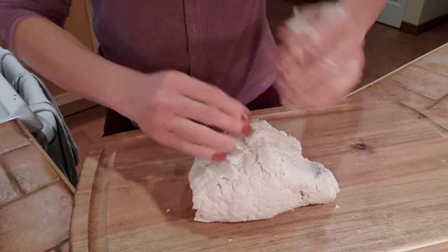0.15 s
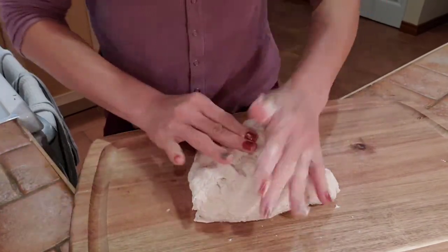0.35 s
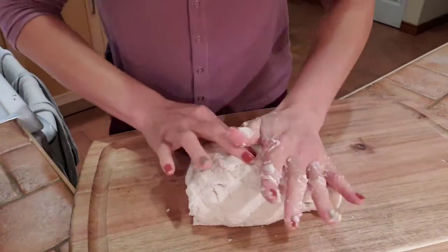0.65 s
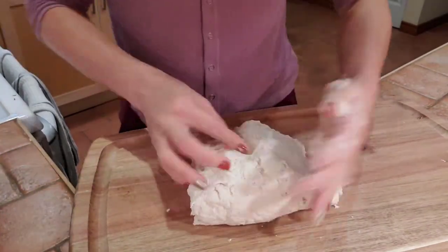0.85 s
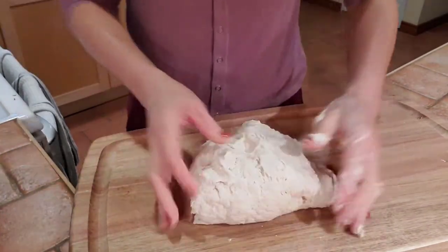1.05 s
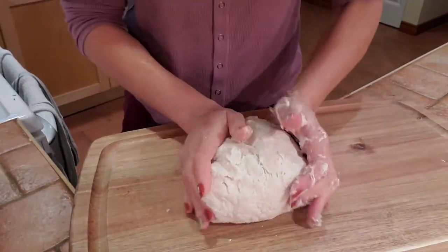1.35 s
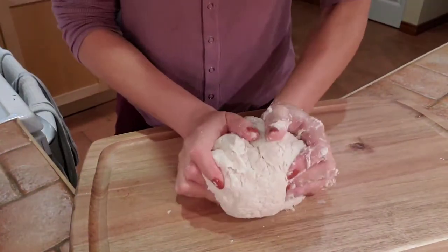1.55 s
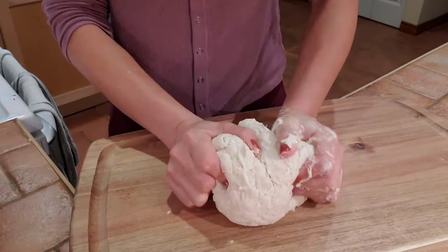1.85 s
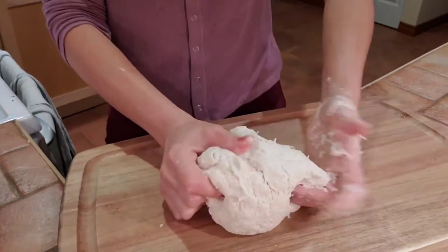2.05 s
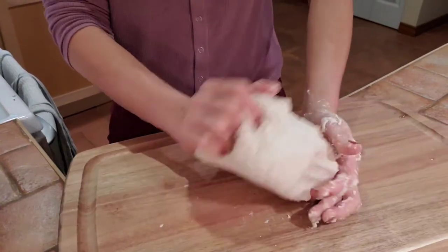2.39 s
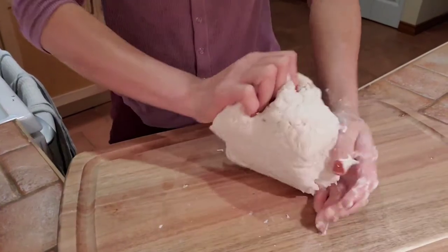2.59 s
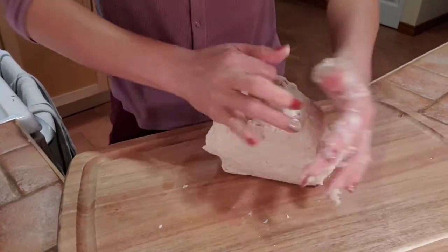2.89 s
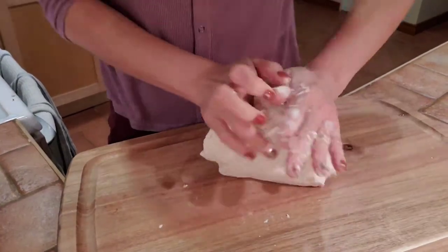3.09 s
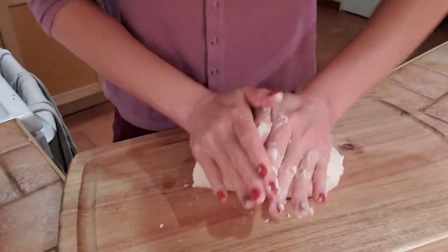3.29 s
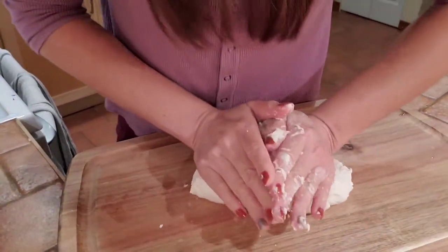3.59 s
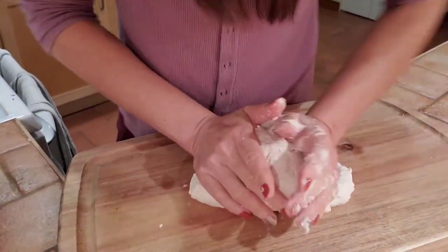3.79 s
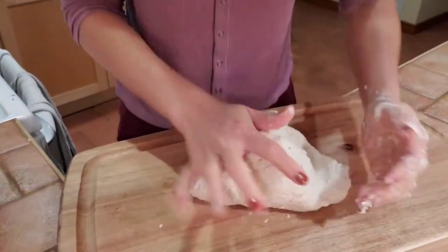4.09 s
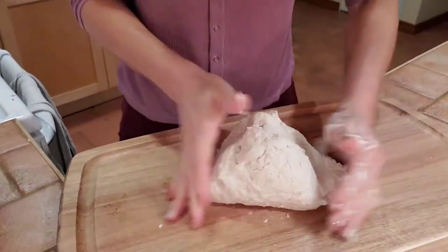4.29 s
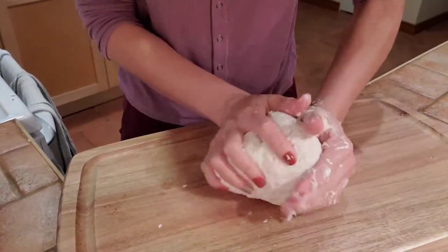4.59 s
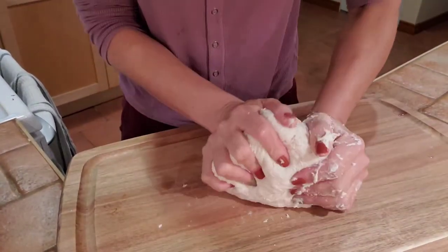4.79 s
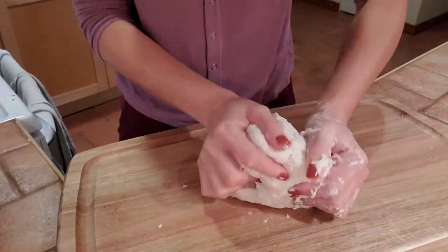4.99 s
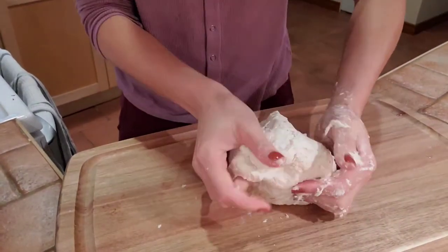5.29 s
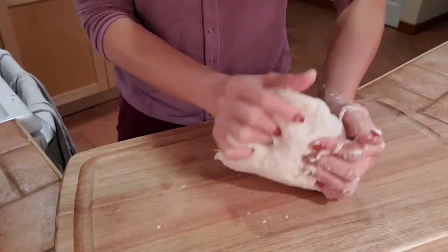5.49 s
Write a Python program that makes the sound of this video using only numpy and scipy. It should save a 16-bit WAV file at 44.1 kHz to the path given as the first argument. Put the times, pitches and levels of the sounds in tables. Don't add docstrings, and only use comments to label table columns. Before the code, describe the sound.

Close stereo sound of dough being kneaded on a wooden board in a quiet kitchen. Deep counter thumps come first, then sticky peeling ticks and a hissy, slightly squeaky rub. A crisp slap and a heavier, duller drop follow mid-way, then softer pressing with abrupt slips around 4 seconds, and finally clustered slaps and a hard woody knock. Short room reverberation, faint metal ringing after heavy blows.

```python
import sys
import numpy as np
from scipy import signal
from scipy.fft import rfft, irfft, next_fast_len
from scipy.io import wavfile
from scipy.ndimage import uniform_filter1d, map_coordinates

SR = 44100
rng = np.random.default_rng(int(sys.argv[2]) if len(sys.argv) > 2 else 0)


def dump(signal):
    limited = np.clip(np.atleast_2d(signal).T, -1, 1)
    pcm = np.round(limited * 32767).astype(np.int16)
    wavfile.write(sys.argv[1], SR, pcm)


def volts_from_db(level):
    exponent = np.asarray(level, float) / 20
    return 10 ** exponent


N = 249165

# peak in seconds, hiss in dB, rise in seconds, fall in seconds, flour minus hiss in dB.
STROKES = [(0.045, -85, .08, 0.042, 14), (2.89, -83.5, .1, .25, 14.5), (0.74, -83, 0.17, .15, 1),
           (0.9, -67.5, 0.13, 0.098, 12.5), (1.15, -75.5, 0.029, 0.46, -3.5), (1.41, -62, 0.11, 0.091, -6),
           (1.57, -65, 0.13, .3, 4), (1.75, -37.5, 0.063, 0.13, 1.5), (1.8, -34, 0.12, 0.051, -2),
           (1.96, -68.5, 0.26, 0.28, -4), (2.114, -51.5, 0.13, 0.07, 2.5), (2.25, -71, .3, 0.22, 11.5),
           (2.438, -47, 0.12, 0.13, 8.5), (2.736, -63.5, 0.1, 0.12, 7), (2.795, -64, 0.026, 0.032, 12),
           (3.904, -67, 0.099, 0.11, 10.5), (3.984, -44, 0.064, 0.037, 1.5), (4.05, -64.5, 0.12, 0.28, 5.5),
           (4.178, -59.5, 0.14, 0.045, 8), (4.56, -67, 0.14, 0.22, 10.5), (5.04, -78.5, 0.031, 0.73, 13),
           (5.12, -69.5, 0.15, 0.095, 9), (5.48, -53, 0.09, 0.21, 9), (5.585, -60.5, 0.15, 0.14, 8)]
LANDINGS = [
    (0.815, -58, 0.023, 0.17, 4),
    (1.32, -68, 0.035, 0.24, 5),
    (2.026, -66.5, .003, 0.098, 12),
    (3.082, -70.5, 0.0036, 0.18, 5),
    (4.385, -62.5, 0.026, 0.23, 0.5),
    (5.144, -63, 0.0068, .13, 7.5),
]
# peak in seconds, rasp in dB, rise in seconds, fall in seconds, drag minus rasp in dB.
PRESSES = [(0.22, -81.5, .12, .3, -11), (2.663, -64, .004, .08, 9.5), (5.135, -62, 0.021, .02, 6),
           (0.46, -65.5, 0.042, 0.11, 5.5), (0.83, -56.5, 0.037, 0.17, 3), (1.15, -71.5, 0.044, 0.19, 10),
           (1.345, -57, 0.028, 0.23, -1), (1.56, -56.5, 0.079, 0.14, 3.5), (1.74, -43.5, 0.11, 0.1, -8),
           (1.81, -40.5, 0.11, 0.073, -3), (2.026, -40, 0.009, 0.025, 7.5), (2.114, -42.5, 0.14, 0.083, 3),
           (2.442, -43, 0.11, 0.074, 4.5), (2.7, -59.5, 0.0042, 0.081, 21.5),
           (2.79, -60.5, 0.053, 0.063, -9), (3.088, -57, 0.019, 0.089, 2), (3.13, -63, 0.022, 0.19, 5),
           (3.984, -47, 0.058, 0.064, 1.3), (4.03, -74.5, .05, 0.38, 11), (4.178, -62.5, 0.22, 0.039, 8.5),
           (4.36, -61.5, 0.0036, 0.092, 4.5), (4.45, -65, 0.28, 0.22, 11), (5.07, -75, 0.12, 0.41, 5.5),
           (5.145, -45, .003, 0.091, 11.5), (5.48, -57.5, 0.062, 0.27, 3), (5.635, -71, .003, 0.044, 26.5)]
# start in seconds, peak in dB, rasp
# minus hiss in dB, 60 dB decay in seconds.
TOUCHES = [(0.4333, -37, -4, 0.3), (0.8076, -39.5, -8, 0.1), (0.9188, -42.5, -27, 0.027),
           (2.2644, -45, -3, 0.063), (2.3687, -30.5, 1.5, 0.089), (3.2415, -38.5, -36, 0.13),
           (3.2654, -48.5, -21.5, 0.083), (3.8776, -40.5, -7, 0.093), (3.9608, -34, -10, 0.1),
           (3.9764, -34.5, 9, 0.072), (4.1887, -48, -1.5, 0.037), (4.35, -46.5, 4, 0.078),
           (2.4319, -32, 5.5, 0.052), (1.135, -64, 0, 0.045), (2.784, -42, -13, .04),
           (2.806, -42.5, -22.5, .03), (2.828, -47.5, -17, .03), (2.857, -50, -15, .05),
           (2.972, -57.5, -15, 0.048), (3.12, -47, -12, .04), (1.664, -44, 2.5, .05), (1.721, -31, -1, 0.037)]
# frequency in Hz, density in dB per Hz.
HISS = [(2120, -39), (3600, -8.5), (4310, -4), (4730, -2), (5490, -2.5), (5960, -1), (6960, -2.5),
        (8400, -13), (10900, -46), (18500, -120)]
FLOUR = [(6500, -25.5), (8300, -7), (8900, -1), (9430, -0.5), (10700, -2), (11700, 1), (12800, -2.5),
         (14800, 3), (15600, -13)]
RASP = [(590, -51.5), (1000, -11.5), (1200, 1), (1360, -9), (1530, -2), (1690, -0.5), (2240, -0.5),
        (2700, -0.5), (3350, -2.5), (4200, -5), (5460, -24), (9240, -120)]
DRAG = [(90, -36.5), (150, -9.5), (215, 4), (260, -3.5), (340, -4.5), (500, 2.5), (600, -4), (700, 1),
        (900, -7), (1050, -11.5), (1300, -18), (1800, -42.5), (2800, -120)]
# peak in seconds, centre in Hz, level in dB, rise in seconds, fall in seconds.
SLIDES = [
    (1.348, 688, -44, 0.017, 0.12),
    (1.8, 2337, -39.5, 0.15, 0.14),
    (3.0, 2350, -68.5, 0.081, 0.13),
    (3.092, 1720, -52.5, .015, 0.018),
    (3.135, 1745, -45, 0.022, 0.083),
    (3.36, 1665, -62, 0.4, 0.069),
    (4.35, 1890, -57, 0.22, 0.22),
    (4.458, 1770, -50.5, .2, 0.064),
]
# start in seconds, peak in dB, slap minus peak in dB,
# contact in milliseconds, left minus right in dB.
BLOWS = [(1.136, -43, -16, 1.3, 1.5), (2.0214, -15, 4, 0.17, 3.5), (2.032, -17.5, -9, 0.23, 2.5),
         (2.66, -47, 1, 0.41, -6), (2.687, -18.5, -9.5, 0.14, -2), (2.693, -10.5, -23, 3.1, 10.5),
         (2.712, -12.5, -24, 2.16, -0.5), (2.741, -19.5, -37, 2.9, 6), (3.033, -44, -19, 1.7, 19),
         (4.352, -38, 1, 0.79, 1.5), (5.141, -20, 0.5, 0.2, 15), (5.157, -16, 2.5, 0.43, 2.5),
         (5.172, -21, -29, 2, -8.5), (5.2018, -24.5, -18, 7.8, 8), (5.627, -21, -15.5, 1.3, 9),
         (5.634, -6.5, -30.5, 2.7, 4)]
# frequency in Hz, level in dB, 60 dB decay in seconds.
BOARD_MODES = [(122.3, -7, 0.29), (153.4, -9.5, 0.15), (206, -9, 0.12), (221.9, -8, .18),
               (301.2, -12, 0.24), (352, -0.5, 0.063), (397.6, -9, 0.14), (470.4, -1.5, 0.076),
               (502.2, 0, 0.055), (699, 0.8, 0.062), (817, -3.5, 0.098), (894, -4, 0.1), (952, -7.5, 0.1),
               (1192, -10, 0.071)]
# frequency in Hz, width in Hz, level in dB.
SLAP_MODES = [(1342, 51, 0.5), (1620, 200, 1.1), (2070, 160, -2.5), (2440, 300, -7), (3280, 800, -14),
              (4550, 1080, -26)]
# start in seconds, peak in dB, pitch in Hz, 60 dB decay in seconds.
POPS = [(2.0213, -16, 1725, .03), (2.023, -15, 697, 0.048), (2.0873, -34, 1760, 0.059),
        (2.6878, -34.5, 1890, 0.044), (2.689, -25.5, 914, 0.044), (2.694, -18, 505, 0.11),
        (2.694, -36, 1950, .03), (2.7, -37, 1560, .05), (2.697, -31, 1200, .05),
        (4.363, -41.5, 1835, 0.048), (5.141, -20.5, 1780, 0.033), (5.17, -37.5, 1600, .12),
        (5.628, -31, 1700, .04), (2.036, -26.5, 950, .07), (2.022, -36, 4600, .02),
        (2.036, -38, 3580, .025), (5.141, -21, 800, 0.036), (5.1575, -30.5, 2570, .035),
        (5.158, -20, 505, 0.1), (5.16, -35, 3280, .04)]
# peak in seconds, sway in dB, rise in seconds, fall in seconds, panel minus sway in dB.
LEANS = [(0.0, -26.5, 0.091, 0.059, -15), (0.18, -32.5, 0.058, 0.29, 0), (0.47, -39, 0.12, 0.097, -6.5),
         (0.83, -46, 0.065, 0.15, 2), (1.04, -37.5, 0.27, 0.086, -1.5), (1.16, -43, 0.02, 0.098, 8.5),
         (1.34, -52, 0.066, 0.072, 14), (1.66, -34.5, 0.12, 0.2, -10), (1.92, -39, 0.75, 0.13, -0.5),
         (2.04, -33, 0.035, 0.19, -2), (2.4, -42, 0.22, 0.2, 1), (2.77, -45.5, 0.044, 0.15, 9),
         (2.88, -42, .2, 0.13, -2), (3.05, -39, 0.11, 0.11, 1), (3.16, -45, 0.17, 0.11, 0),
         (3.3, -37.5, 0.072, 0.36, -4), (4.03, -45, 0.41, 0.1, 8.5), (4.11, -41, 0.076, 0.5, -8),
         (4.5, -54.5, 0.14, 0.098, 10), (5.0, -40.5, 0.32, 0.23, -4), (5.21, -33.5, 0.045, 0.097, 7),
         (5.4, -38, 0.38, 0.14, -5), (5.54, -39, 0.11, 0.12, -7)]
# start in seconds, peak in dB, pitch in Hz, 60 dB decay in seconds, rise in seconds.
PUSHES = [(0.166, -9, 52.3, 0.3, 0.02), (0.183, -5, 90, 0.12, 0.017), (0.26, -24.5, 95, 0.27, 0.0201),
          (1.142, -29.5, 86.6, 0.14, 0.0043), (1.651, -18, 64, 0.13, 0.01),
          (1.682, -22.5, 42, 0.19, 0.0079), (1.899, -20, 42.5, 0.26, 0.021),
          (2.027, -14.5, 86.8, 0.16, 0.009), (2.696, -2.5, 90, 0.13, 0.02),
          (2.694, -19.5, 131, 0.16, 0.0038), (2.738, -19.5, 100, 0.089, 0.0036),
          (3.29, -38, 65.02, 0.061, 0.012), (3.363, -32, 72, 0.47, 0.0043),
          (4.354, -22.5, 90, 0.22, 0.0059), (4.402, -19.5, 88.3, 0.11, 0.0092),
          (5.143, -21, 83.5, 0.24, 0.0032), (5.203, -14.5, 69.7, 0.1, 0.0025), (5.228, -26, 74, .2, .003),
          (5.63, -10.5, 90, 0.053, 0.0063)]
# frequency in Hz, width in Hz, level in dB.
SWAY_MODES = [(42, 18.8, -3), (59.1, 6.96, 1.5)]
PANEL_MODES = [(76.46, 10.8, 5), (90, 15.7, 3.5), (122, 19, -4.5)]
# start in seconds, level in dB.
JOLTS = [
    (2.03, -52),
    (2.7, -41.5),
    (5.16, -49),
    (5.636, -40),
]
# frequency in Hz, level in dB, 60 dB decay in seconds.
SINK_MODES = [(222, -1, 1.8), (290, -12.5, 1.6)]
# frequency in Hz, 60 dB decay in seconds.
KITCHEN = [(150, 0.48), (700, 0.48), (3000, 0.41), (12000, 0.098)]
# frequency in Hz, density in dB per Hz.
QUIET = [(76, -3), (130, -4), (172, -20.5), (289, -8), (346, -19), (486, -16.5), (593, -31), (682, -22.5),
         (885, -37.5), (1430, -36), (6930, -44.5), (7970, -46), (12100, -41.5), (15400, -38)]
# frequency in Hz, likeness from -1 to 1.
ALIKE = [(60, 0.9), (200, 0.91), (500, 0.16), (1500, 0.19), (5000, 0.12), (15000, 0.36)]
QUIET_ALIKE = [(60, 0.33), (180, 0.6), (550, 0.17), (1650, -0.18), (4970, -0.074), (15000, -0.076)]
# frequency in Hz, lead in radians.
LEAD = [(0, -6), (690, 1.07), (1810, -7), (3880, -1.15), (4820, 12), (9650, 8), (10900, 16.5),
        (13300, 11.5), (14900, -1.5), (15500, 6.5)]
BOARD_LEAD = [(150, .1), (350, 0.68), (700, 1), (1400, 1.7), (4000, 2.1)]
# frequency in Hz, left minus right in dB.
LOUDER = [(60, -2.5), (110, -0.5), (200, -7.5), (380, -3.5), (700, 3), (1290, 5), (2380, 6), (4400, 8.5),
          (8120, 3), (15000, 1)]
# frequency in Hz, level in dB.
FRIDGE = (119.8, -62)
ROUND_STROKE, ROUND_PRESS, ROUND_LEAN = 1.23, 1.2, 1.14
STILL_DB, REST_DB = -96.5, -65


def unit(x):
    return x / np.sqrt(np.mean(x ** 2) + 1e-20)


def along(points, hz):
    f, v = np.transpose(points)
    return np.interp(np.log(hz + 1), np.log(f + 1), v)


def wobble(rate):
    knots = rng.standard_normal(int(N * rate / SR) + 4)
    return map_coordinates(knots, [np.arange(N) * rate / SR])


def filtered(x, response):
    m = next_fast_len(N + SR // 2)
    spectrum = rfft(x, m) * response(np.fft.rfftfreq(m, 1 / SR))
    return irfft(spectrum, m)[..., :N]


def resonances(peaks):
    def response(f):
        total = 0
        for k, (centre, width, db) in enumerate(peaks):
            total = total + (-1) ** k * volts_from_db(db) * 1j * f * width / (centre * centre - f * f + 1j * f * width)
        return total
    return response


def sides(pan_db):
    return volts_from_db(np.array([pan_db, -pan_db]) / 2)


def spaced(pair, lead, louder):
    def response(hz):
        phase = 0.5 * np.outer([1, -1], along(lead, hz))
        return sides(along(louder, hz)) * np.exp(1j * phase)
    return filtered(pair, response)


def add(track, s, sound):
    part = track[..., round(s * SR):][..., :sound.shape[-1]]
    part += sound[..., :part.shape[-1]]


def swells(rows, roundness, rest_db):
    t = np.arange(0, N, step=16) / SR
    s, db, rise, fall, other_db = np.transpose(rows)[:, :, None]
    before = (s - t) / np.maximum(rise, 1e-3)
    after = (t - s) / np.maximum(fall, 1e-3)
    away = np.where(t < s, before, after)
    gain = volts_from_db(db - 20 * away ** roundness)
    layers = (gain, gain * volts_from_db(other_db))
    return [np.interp(np.arange(N) / SR, t, volts_from_db(rest_db) + g.sum(0)) for g in layers]


def rush(spectrum, alike, patchy_db, grain_db):
    grain = volts_from_db(grain_db * np.clip(wobble(300), -2, 2))
    z = signal.stft(rng.standard_normal((2, N)) * grain, nperseg=512)[2]
    field = rng.standard_normal(z.shape[1:])
    field = uniform_filter1d(uniform_filter1d(field, size=3, axis=0), size=14, axis=1)
    pair = signal.istft(z * volts_from_db(patchy_db * unit(field)), nperseg=512)[1][:, :N]

    def colour_and_width(hz):
        turn = np.arccos(np.clip(along(alike, hz), -1, 1)) / 2
        return volts_from_db(along(spectrum, hz)) * [np.cos(turn), np.sin(turn)]
    mid, side = filtered(pair, colour_and_width)
    return unit(np.array([mid + side, mid - side]))


def rubbing():
    uneven = volts_from_db(0.26 * wobble(25) + 1.0 * wobble(90))
    hiss, flour = uneven * swells(STROKES + LANDINGS, ROUND_STROKE, STILL_DB)
    rasp, drag = swells(PRESSES, ROUND_PRESS, STILL_DB)
    rasp = uneven * rasp
    creep = volts_from_db(-32.5) * swells(LEANS, ROUND_LEAN, REST_DB)[0]
    drag = np.minimum(drag + creep, volts_from_db(-41.5))
    t = np.arange(SR // 2) / SR
    for s, db, more_db, t60 in TOUCHES:
        tick = 1 + 0.93 * volts_from_db(-60 * t / 0.057)
        puff = volts_from_db(db - 21 - 60 * t / t60) * tick
        add(hiss, s, puff)
        add(flour, s, 1.3 * puff)
        add(rasp, s, volts_from_db(more_db) * puff)
    skin = np.zeros((2, N))
    for gain, colour in [(hiss, HISS), (flour, FLOUR), (rasp, RASP)]:
        skin += gain * rush(colour, ALIKE, patchy_db=2.3, grain_db=1.0)
    wood = drag * rush(DRAG, ALIKE, patchy_db=3.5, grain_db=-0.5)
    return spaced(skin + wood, LEAD, LOUDER)


def slides():
    out, t = np.zeros((2, N)), np.arange(N) / SR
    shared = wobble(400) + 1j * wobble(400)
    band = shared + 0.71 * np.array([wobble(400), wobble(400)])
    sag_per_s = 0.14
    for s, hz, db, rise, fall in SLIDES:
        gain = swells([(s, db - 7.0, rise, fall, 0)], ROUND_PRESS, -np.inf)[0]
        cycles = hz * (t - sag_per_s * (t - s) ** 2 / 2)
        out += gain * np.real(band * np.exp(2j * np.pi * cycles))
    return spaced(out, LEAD, LOUDER)


def board():
    wood, slap, t = np.zeros((2, N)), np.zeros((2, N)), np.arange(SR // 2) / SR
    hz, level, t60 = np.transpose(BOARD_MODES)[:, :, None]
    chance = rng.standard_normal((len(BLOWS), len(BOARD_MODES), 3))
    for (s, db, slap_db, ms, pan), luck in zip(BLOWS, chance):
        level_luck, phase_luck, pitch_luck = luck[:, :1], luck[:, 1:2], luck[:, 2:]
        dull = 1 / (1 + (hz * max(ms, .05) / 1000) ** 2)
        decay = volts_from_db(level + 0.47 * level_luck - 60 * t / t60)
        ring = dull * decay * np.sin(2 * np.pi * hz * (1 + 0.02 * pitch_luck) * t + 0.93 * phase_luck)
        onset = 1 - np.exp(-t / 0.001)
        add(wood, s, volts_from_db(db - 7.0) * ring.sum(0) * onset * sides(0.26 * pan)[:, None])
        crack = volts_from_db(-60 * t / 0.022) * rng.standard_normal(len(t))
        add(slap, s, volts_from_db(db + slap_db + 8.0) * crack * sides(pan)[:, None])
    return spaced(wood + filtered(slap, resonances(SLAP_MODES)), BOARD_LEAD, [(300, 0.1), (3000, 0.59)])


def pops():
    out, t = np.zeros((2, N)), np.arange(SR // 4) / SR
    onset = 1 - np.exp(-t / 0.0009)
    for s, db, hz, t60 in POPS:
        tone = volts_from_db(db - 60 * t / t60) * onset * np.sin(2 * np.pi * hz * t)
        add(out, s, tone * sides(2.2)[:, None])
    return spaced(out * (1 + .7 * wobble(500)), BOARD_LEAD, [(300, 0.1), (3000, 0.6)])


def counter_hum(peaks):
    response = resonances(peaks)
    x = unit(filtered(rng.standard_normal(N), lambda f: response(f) / (1 + (f / 140) ** 8)))
    return unit(x / (np.abs(signal.hilbert(x)) + 0.36) ** 0.78)


def counter():
    sway, panel = np.minimum(swells(LEANS, ROUND_LEAN, REST_DB), volts_from_db(-23.5))
    out = sway * counter_hum(SWAY_MODES) + panel * counter_hum(PANEL_MODES)
    t = np.arange(SR // 2) / SR
    for s, db, hz, t60, rise in PUSHES:
        onset = 1 - np.exp(-(t / rise) ** 2)
        add(out, s, volts_from_db(db + 3.5 - 60 * t / t60) * onset * np.sin(2 * np.pi * hz * t))
    shake = unit(filtered(rng.standard_normal(N), resonances(PANEL_MODES)))
    stray = volts_from_db(-24.5) * sway * shake
    return out + [stray, -stray]


def sink():
    out, t = np.zeros(N), np.arange(2 * SR) / SR
    for s, db in JOLTS:
        for hz, level, t60 in SINK_MODES:
            add(out, s, volts_from_db(level + db - 60 * t / t60) * np.sin(2 * np.pi * hz * t))
    return out


def near_walls(pair, echo_db):
    delay = rng.uniform(0.001053, .02, (2, 8))
    sign = rng.standard_normal((2, 8))

    def comb(f):
        copies = sign[..., None] * np.exp(-2j * np.pi * f * delay[..., None])
        return 1 + volts_from_db(echo_db) * copies.sum(1)
    return filtered(pair, comb)


def kitchen(pair):
    late = np.pad(pair.mean(0), (200, 0))[:N]
    answer, step = np.zeros((2, N)), SR // 2
    for start in range(0, N, step):
        hz, t, z = signal.stft(rng.standard_normal((2, SR // 2)), SR, nperseg=256)
        decay = volts_from_db(-60 * t / along(KITCHEN, hz)[:, None])
        tail = signal.istft(z * decay, SR, nperseg=256)[1]
        tail = tail / np.linalg.norm(tail[0])
        add(answer, start / SR, signal.fftconvolve(late[None, start:start + step], tail, axes=1))
    mid, side = answer
    side = filtered(side, lambda f: f * f / (f * f + 450 ** 2))
    return np.array([mid + side, mid - side]) / np.sqrt(2)


def refrigerator():
    hz, db = FRIDGE
    return volts_from_db(db) * np.sin(2 * np.pi * hz * np.arange(N) / SR)


def quiet():
    return volts_from_db(-55.5) * rush(QUIET, QUIET_ALIKE, patchy_db=0.0, grain_db=2.0)


def scene():
    hands = near_walls(rubbing(), echo_db=-17.0) + slides()
    knocks = near_walls(board(), echo_db=-18.5)
    palm = near_walls(pops(), echo_db=-22)
    room = volts_from_db(-17.5) * kitchen(hands) + volts_from_db(-10.0) * kitchen(knocks) + volts_from_db(-19.5) * kitchen(palm)
    return hands + knocks + palm + counter() + sink() + room + refrigerator() + quiet()


def band_limit(x):
    return signal.sosfilt(signal.butter(12, 15950, fs=SR, output="sos"), x)


def record(dry):
    mix = filtered(dry, lambda hz: hz < 15650)
    return band_limit(mix)


dry = scene()
out = record(dry)
dump(out)
```